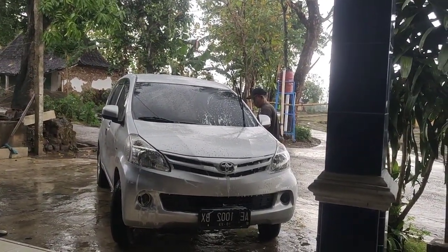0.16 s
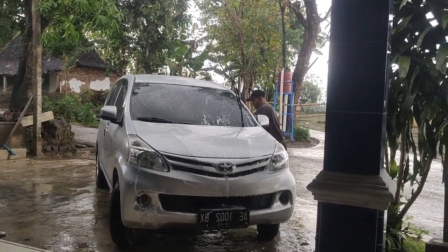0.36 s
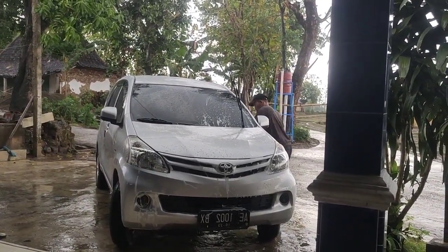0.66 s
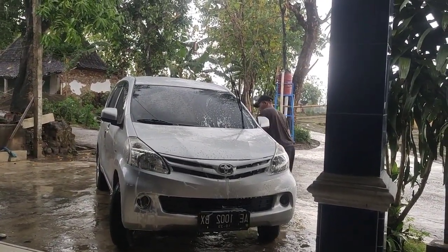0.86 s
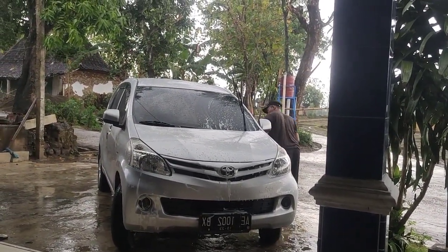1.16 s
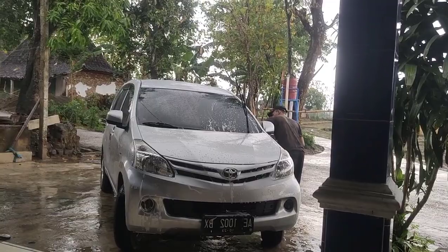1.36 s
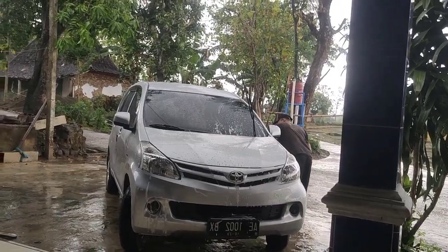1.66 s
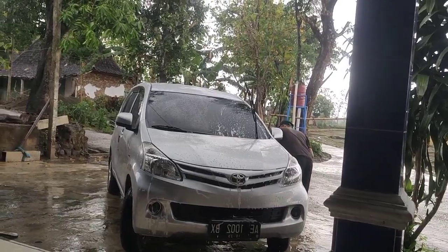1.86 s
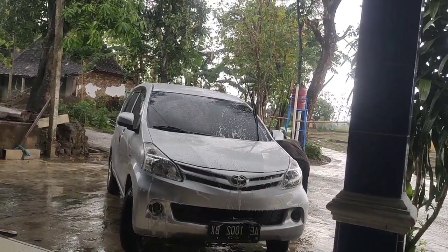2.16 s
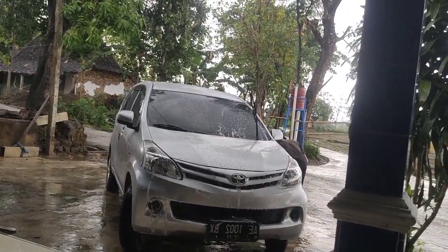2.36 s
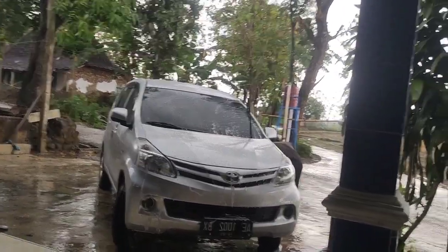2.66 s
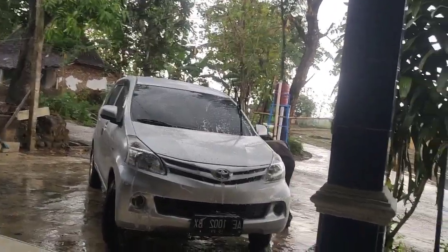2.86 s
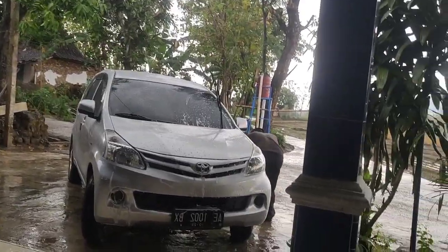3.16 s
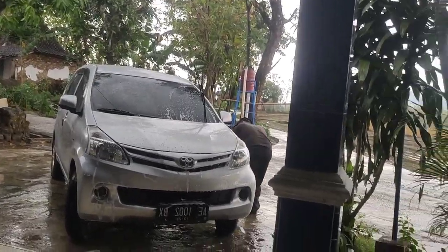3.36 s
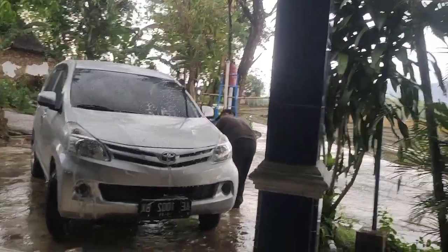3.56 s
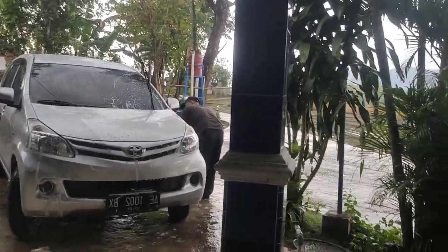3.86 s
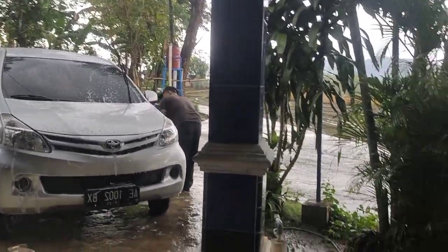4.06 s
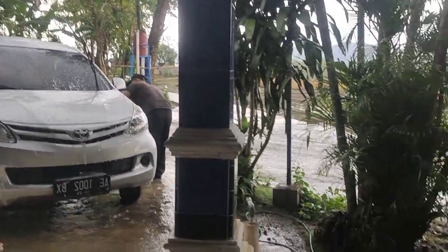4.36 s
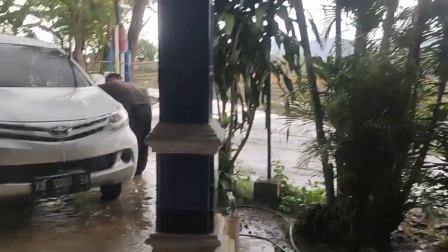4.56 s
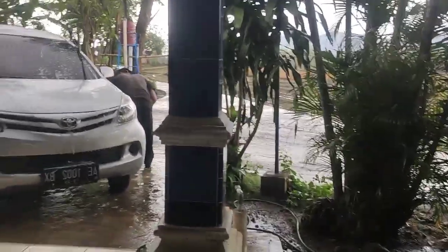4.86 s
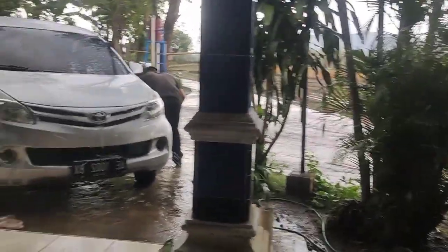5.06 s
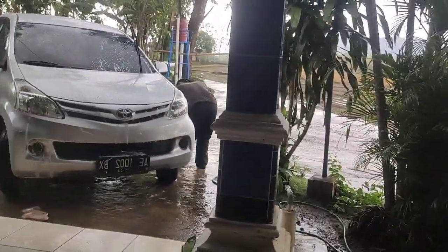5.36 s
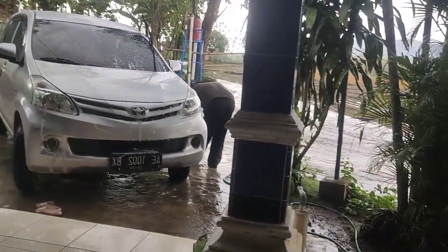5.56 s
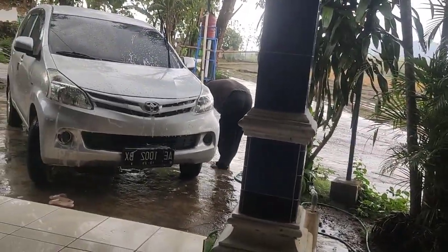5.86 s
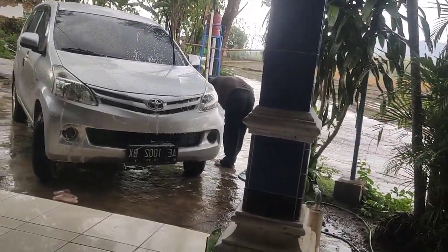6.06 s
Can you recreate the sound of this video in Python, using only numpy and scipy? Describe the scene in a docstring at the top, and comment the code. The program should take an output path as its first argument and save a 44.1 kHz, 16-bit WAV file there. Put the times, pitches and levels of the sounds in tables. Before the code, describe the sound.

Light rain hisses steadily around a porch, with a few sharp drips and tiny splashes close by at the start. Hens suddenly break into loud, hoarse squawks, overlapped by clear cries and two wails. The raspy hen carries on alone in shorter, evenly spaced calls, ends with one longer squawk, and the flock settles into soft clucks. A thin chick whistle peeps to the right.

```python
"""Chickens in a wet yard

Chickens cackle over a steady hiss of water, heard from a porch: pulsed, turbulent squawks of a hoarse hen,
clear harmonic cries of others over her, then soft clucks shaped by a beak resonance. A chick whistles to the
right. Noise bursts make drops and splashes on the paving; shaped noise makes the hiss and a breeze."""
import sys
import numpy as np
from scipy import signal
from scipy.fft import rfft, irfft, next_fast_len
from scipy.io import wavfile
from scipy.ndimage import uniform_filter1d, minimum_filter1d

SR = 44100
rng = np.random.default_rng(int(sys.argv[2]) if len(sys.argv) > 2 else 0)


def generate_wav(signal):
    """Clip the signal to [-1, 1] and save it as 16-bit WAV at the path in sys.argv[1]."""
    frames = np.transpose(np.atleast_2d(signal))
    scaled = np.clip(frames, -1, 1) * 32767
    pcm = np.round(scaled).astype(np.int16)
    wavfile.write(sys.argv[1], SR, pcm)


N = 274302  # length in samples
EDGE_HZ = 11650  # cutoff of the final low-pass; overtones of the clear voices stop below it


def gain_of(db):
    """Level law: decibels to amplitude."""
    return 10 ** (np.asarray(db) / 20)


def evened(x):
    """Equal power: scales to rms 1."""
    return x / np.sqrt(np.mean(x ** 2) + 1e-20)


def read(points, hz):
    """Interpolation on a log-frequency axis, with the end values held beyond the table."""
    f, value = np.transpose(points)
    return np.interp(np.log(hz + 1), np.log(f + 1), value)


def add(mix, s, sound):
    """Superposition: mixes a sound in at time s in seconds."""
    part = mix[max(round(s * SR), 0):][:len(sound)]
    part += sound[:len(part)]


def laid_out(source, table):
    """Superposition of one source's events: the first column is the start, the rest go to the source."""
    track = np.zeros(N)
    for s, *row in table:
        add(track, s, source(*row))
    return track


def filtered(x, gain):
    """Linear filtering: multiplies the spectrum by a gain that is a function of frequency."""
    size = next_fast_len(x.shape[-1] + 2048)
    spectrum = rfft(x, size) * gain(np.fft.rfftfreq(size, 1 / SR))
    return irfft(spectrum, size)[..., :x.shape[-1]]


def waver(size, hz):
    """Random modulation: low-passed noise of rms 1, up to about hz changes a second."""
    return evened(filtered(rng.standard_normal(size), lambda f: 1 / (1 + (f / hz) ** 4)))


def fade(size, edge_s):
    """Tapered window: a soft start and end."""
    return signal.windows.tukey(size, min(2 * edge_s * SR / size, 1))


def envelope(t, attack_s, release_s):
    """Amplitude envelope: smooth attack, hold, straight release."""
    attack = np.sin(np.pi / 2 * np.minimum(t / attack_s, 1)) ** 2
    return attack * np.minimum((t[-1] - t) / release_s, 1)


def diffuse(pair):
    """Diffuse field: left-right coherence varies with frequency, high near 400 Hz and low in the treble."""
    # Each row: frequency in Hz, coherence of left and right from 0 to 1.
    coherence = [(30, .1), (85, 0.51), (140, 0.856), (400, 0.943), (800, 0.152), (1400, 0), (3000, 0.112),
                 (11000, 0)]
    mid = filtered(pair[0], lambda f: np.sqrt((1 + np.clip(read(coherence, f), -1, 1)) / 2))
    side = filtered(pair[1], lambda f: np.sqrt((1 - np.clip(read(coherence, f), -1, 1)) / 2))
    return np.array([mid + side, mid - side])


def water_hiss(level_db=-47.5, drops_per_s=700, patter=0.443, spread_db=3, flicker_db=1):
    """Many random impacts sum to noise: a wash of far drops, a patter of nearer ones, a flickering treble."""
    # Spectrum of the hiss. Each row: frequency in Hz, relative density in dB per Hz.
    spectrum = [(18, -60.5), (30, -30.5), (48, -21.5), (184, 0), (343, -2.5), (418, 2), (671, 1.5),
                (1310, -8), (2000, -5.5), (3460, -8.5), (4670, -17.5), (7670, -7), (8690, -11.5),
                (9840, -30.5), (11400, -23.5), (14800, -68), (22000, -120)]
    # Slow course of the treble. Each row: time in seconds, treble gain in dB.
    treble_course = [(0, 7), (.45, 8), (1.5, 12), (3.7, 7.5), (4.4, 6.5), (5.1, 4), (6.2, 4)]
    sizes = gain_of(spread_db * np.minimum(rng.exponential(1, (2, N)), 4)) * rng.choice([-1, 1], (2, N))
    near = evened(sizes * (rng.random((2, N)) < drops_per_s / SR))
    wash = diffuse(rng.standard_normal((2, N)) + patter * near)
    wash = evened(filtered(wash, lambda f: gain_of(read(spectrum, f))))
    low = filtered(wash, lambda f: 1 / (1 + (f / 1400) ** 2))
    treble_db = np.interp(np.arange(N) / SR, *np.transpose(treble_course)) + flicker_db * waver(N, 42)
    low_swell_db = 1.5 * waver(N, 9.6)
    return gain_of(level_db) * (low * gain_of(low_swell_db) + (wash - low) * gain_of(treble_db))


def breeze(db=-66, centre_hz=95):
    """Turbulent pressure: narrow low noise, slowly wavering, as air lightly buffets the left microphone."""
    rumble = filtered(rng.standard_normal(N), lambda f: 1 / (1 + ((f - centre_hz) / 35) ** 2))
    return np.outer([1, 0], gain_of(db + 2 * waver(N, 2.3)) * evened(rumble))


def drop(peak_db, spray_s, tick_s=0.00034):
    """Impact noise: a sharp tick on wet paving and a brief spray, two exponential decays."""
    t = np.arange(SR // 16) / SR
    tick = rng.standard_normal(len(t)) * (np.exp(-t / tick_s) + np.exp(-t / spray_s))
    colour = [(600, -47), (2800, -13), (8000, 14.5), (10500, -9.5)]  # Hz, dB
    tick = filtered(tick, lambda f: gain_of(read(colour, f)))
    return gain_of(peak_db) * tick / abs(tick).max()


def splash(db, rise_s, grain_db=3):
    """Scattered water as grainy noise: a soft swell of fine spray on the paving."""
    t = np.arange(SR // 4) / SR
    spray = rng.standard_normal(len(t)) * gain_of(grain_db * waver(len(t), 400))
    colour = [(900, -34), (2900, 8.0), (5200, -5.5), (7700, 1.5), (10500, -13.5)]  # Hz, dB
    spray = evened(filtered(spray, lambda f: gain_of(read(colour, f))))
    return gain_of(db) * spray * t / rise_s * np.exp(1 - t / rise_s)


def paving():
    """Independent impacts: single drops and splashes near by."""
    # Near drops. Each row: start in seconds, peak in dB, decay of the spray in seconds.
    near_drops = [(0.0487, -26, 0.00253), (0.1363, -21.5, 0.003), (0.446, -34.5, 0.0065),
                  (0.696, -30.5, 0.0082), (1.896, -25, 0.0098), (2.588, -31.5, 0.00576),
                  (2.88, -34, 0.0062), (3.6374, -37.5, 0.0085), (4.7736, -35, 0.0108),
                  (6.1027, -35.5, 0.0096)]
    # Soft splashes. Each row: start in seconds, level in dB, rise in seconds.
    soft_splashes = [(0.06, -35.5, 0.00504), (0.144, -39.5, 0.0097), (0.305, -41.5, 0.0116)]
    return laid_out(drop, near_drops) + laid_out(splash, soft_splashes)


def cycles(hz, jitter, jitter_hz):
    """Phase is the integral of frequency: cycle count of a membrane whose pitch trembles."""
    return np.cumsum(hz * (1 + jitter * waver(len(hz), jitter_hz))) / SR


def peep(db, top_hz, length, fall=0.27, swell_db=7, quaver=0.0702):
    """Pure tone: a thin whistle that holds its top note, then drops, louder and quavering."""
    u = np.linspace(0, 1, int(length * SR))
    hz = top_hz * (1 - fall * np.minimum(abs(u - .25) / .66, 1) ** 3.6)
    whistle = np.sin(2 * np.pi * cycles(hz, .005 + quaver * u ** 4, 350))
    whistle *= gain_of(swell_db * u ** 3) * envelope(u * length, attack_s=0.0506, release_s=0.00084)
    return gain_of(db) * evened(whistle)


def chick_peeps():
    """Repeated pure tones of the chick, at a common trim of -5 dB."""
    # Each row: start in seconds, level in dB before the trim, top pitch in Hz, length in seconds.
    peeps = [(0.147, -48.5, 4375, 0.148), (0.538, -48, 4410, 0.185), (4.26, -46.5, 4449, 0.1496),
             (4.832, -48, 4303, 0.1716), (5.17, -45, 4477, 0.15), (5.763, -47, 4450, 0.147)]
    return gain_of(-5.0) * laid_out(peep, peeps)


def puffs(turns):
    """Modulated turbulence: noise let through once a cycle."""
    return evened((0.087 + np.exp(-(turns % 1) / 0.69)) * rng.standard_normal(len(turns)))


def gesture(length, start_hz, crest_hz, end_hz, crest, bend, droop):
    """Pitch follows one push of air to a crest and back; early: climb still to go, late: sag so far, 0-1."""
    t = np.arange(0, length, 1 / SR)
    crest_s = length * np.clip(crest, .05, .95)
    early = np.cos(np.pi / 2 * np.minimum(t / crest_s, 1) ** bend) ** 2
    late = (np.maximum(t - crest_s, 0) / (length - crest_s)) ** droop
    hz = crest_hz + (start_hz - crest_hz) * early + (end_hz - crest_hz) * late
    return t, hz, early, late


def roughness(t, core, onset, ending, settle_s, break_s):
    """Unstable oscillation: the syrinx catches roughly, settles, and breaks up as the air runs out."""
    rough = core + onset * np.exp(-t / settle_s) + ending * np.exp((t - t[-1]) / break_s)
    return np.clip(rough, .02, .9)


def partials(turns, orders, flicker_db, smear):
    """Harmonic series, one a row, each swelling on its own; uneven timing blurs the high ones."""
    turns = turns + smear * waver(len(turns), 300)
    rows = []
    for k in orders:
        tone = np.cos(2 * np.pi * (k * turns + rng.random()))
        rows.append(tone * gain_of(flicker_db * waver(len(turns), 45)))
    return np.array(rows)


def rattle(rough, rate_hz, depth):
    """Amplitude modulation: an uneven beat of the syrinx sets side tones beside each partial."""
    beat = np.cos(2 * np.pi * cycles(np.full(len(rough), rate_hz), .25, 50))
    swing = np.minimum(depth * rough, 1)
    return (1 + swing * beat) / np.sqrt(1 + swing ** 2 / 2)


def clear_voice(hz, tone_db, overtone_db, rough, shrill_db, jitter=0.05096):
    """Source and filter, open beak: strong fundamental, breathy overtones that swell at throat resonances."""
    # Throat of the clear voices. Each row: frequency in Hz, gain in dB.
    throat = [(300, -19), (650, 19), (1120, 1.5), (1400, 14.5), (1720, 18), (2060, -4.5), (2280, -19),
              (2750, -11.5), (3900, -68), (4450, -19.5), (5200, -19.5), (6400, -20.5), (7300, -13.5),
              (9600, -41)]
    size, turns = len(hz), cycles(hz, jitter * rough, 113.8)
    k = np.arange(2, 17)[:, None]
    weight = gain_of(read(throat, k * hz)) * (k * hz < EDGE_HZ)
    upper = (weight * partials(turns, k[:, 0], flicker_db=2, smear=.002 + .03 * rough)).sum(0)
    doubling = 1 + np.minimum(3 * rough, 1) * np.cos(np.pi * turns)  # strain doubles the period
    upper = evened(upper / np.linalg.norm(weight, axis=0) * doubling)
    air = evened(filtered(puffs(turns), lambda f: gain_of(read(throat, f))))
    hiss = filtered(air, lambda f: 1 - 1 / (1 + (f / 4000) ** 8))
    upper = np.sqrt(1 - rough ** 2) * upper + .45 * rough * air + 2.8 * np.minimum(rough, .35) * hiss
    upper = filtered(upper, lambda f: gain_of(read([(3000, 0.008), (4800, shrill_db)], f)))
    voice = gain_of(tone_db) * np.sqrt(2) * np.cos(2 * np.pi * turns) + gain_of(overtone_db) * upper
    voice *= rattle(rough, rate_hz=85., depth=1.3) * gain_of(3 * rough * waver(size, 80))
    return voice * envelope(np.arange(size) / SR, attack_s=0.03186, release_s=0.01445)


def cry(length, tone_db, overtone_db, start_hz, crest_hz, end_hz, crest, core, shrill_db):
    """Pitch and level rise with effort: a short arched cry, rough at both ends."""
    t, hz, early, late = gesture(length, start_hz, crest_hz, end_hz, crest, bend=0.7, droop=1.494)
    rough = roughness(t, core, onset=.35, ending=.45, settle_s=.022, break_s=.018)
    tone_course_db = tone_db - 8 * early - 8 * late
    return clear_voice(hz, tone_course_db, overtone_db - 6 * early ** 2, rough, shrill_db)


def squawk(length, body_db, rasp_db, start_hz, crest_hz, end_hz, crest, core, chest_db, bend, slip,
           uneven=0.903, flutter_db=3, hiss=0.26, jitter=0.03, drop_share=.6,
           collapse=0.10495, collapse_s=0.02457):
    """Source and filter, strained syrinx: uneven trembling pulses and turbulence through the throat."""
    # Throat of the hoarse hen. Each row: frequency in Hz, gain in dB.
    throat = [(190, -26), (275, -9), (380, -13.5), (540, -10.5), (780, -5.5), (950, -2.5), (1130, 0),
              (1350, 0.5), (1650, -5), (1900, -10), (2200, 1), (2700, 1.5), (3150, -4), (3700, -11),
              (4400, -15), (5200, -17.5), (6200, -15.5), (7600, -4), (9600, -34)]
    t, hz, early, late = gesture(length, start_hz, crest_hz, end_hz, crest, bend=bend, droop=1.4)
    # the pitch slips down early, then holds, and collapses as the air runs out
    early_slip = np.sin(np.pi / 2 * np.minimum(late / drop_share, 1)) ** 2
    hz = hz + slip * (end_hz - crest_hz) * (early_slip - late)
    hz = hz * (1 - collapse * np.exp((t - t[-1]) / collapse_s))
    # both bands swell to the crest and sag; the rasp follows her effort more than the body does
    body_course_db = body_db - 3 * early - 4 * late
    rasp_course_db = rasp_db - 3.5 * early - 9 * late
    rough = roughness(t, core, onset=0.12, ending=0.6, settle_s=0.02, break_s=0.03)
    size = len(t)
    wobble = .01 * waver(size, 35)
    turns = cycles(hz * (1 + wobble), 0.00639 + jitter * rough, 137.4)
    pulses = evened(partials(turns, np.arange(1, 21), flicker_db=3, smear=.003).sum(0))
    # alternately strong and weak pulses
    pulses *= 1 + uneven * rough * (1 + waver(size, 21)) * np.cos(np.pi * turns)
    high_air = filtered(puffs(turns), lambda f: 1 - 1 / (1 + (f / 4800) ** 4))
    air = 0.5 * rough * puffs(turns) + hiss * high_air
    drive = ((1 - rough) * evened(pulses) + air) * rattle(rough, rate_hz=115., depth=1.6)
    voice = filtered(drive, lambda f: gain_of(read(throat, f) + chest_db / (1 + (f / 700) ** 8)))
    low = filtered(voice, lambda f: 1 / (1 + (f / 1900) ** 12))
    voice = gain_of(body_course_db - 1.0) * evened(low) + gain_of(rasp_course_db) * evened(voice - low)
    flutter = gain_of(flutter_db * np.sqrt(rough) * waver(size, 120))
    return voice * flutter * envelope(t, attack_s=0.0164, release_s=0.009)


def hoarse_hen():
    """A run of strained pulse trains: the squawks of one hen."""
    # Each row: start in seconds, length in seconds, body setting in dB (1 dB is then taken off), rasp above
    # about 1.9 kHz in dB, start, crest and end pitch in Hz, place of the crest 0-1, core roughness 0-1,
    # chest tone in dB, lateness of the climb (1 = even), early slip of the pitch 0-1.
    squawks = [ (0.484, 0.2, -27, -47.5, 510.3, 581.6, 570, 0.55, 0.12, 7.5, 0.74, 0.1),
               (0.889, 0.274, -24, -45, 527, 536.4, 545.7, 0.2, 0.09, -14, 1.18, 0.04),
               (1.044, 0.5913, -24, -30.5, 468, 584.7, 536.8, 0.76, 0.23, -4.5, 0.9, 0.04),
               (1.663, 0.1332, -23.5, -32, 594.7, 604.2, 533, 0.17, 0.35, -2.5, 1.52, 0.79),
               (1.872, 0.1053, -23.5, -32, 567.2, 563, 501.6, 0.29, 0.08, -4, 1.5, 0.79),
               (2.069, 0.1305, -25, -31.5, 546.4, 551, 518.2, 0.29, 0.09, -2, 1.47, 0.33),
               (2.321, 0.2028, -24.5, -32.5, 531.9, 560.1, 475.3, 0.27, 0.23, -2, 1.318, 0.97),
               (2.618, 0.2, -25, -32.5, 536.9, 555.2, 472.7, 0.27, 0.2, -5, 1.197, 0.95),
               (2.998, 0.2644, -25.5, -31.5, 510.9, 540.3, 494.2, 0.43, 0.15, -3, 1.3, 0),
               (3.376, 0.1996, -26.5, -31.5, 551.6, 548.5, 473, 0.27, 0.23, 4, 0.98, 0.97),
               (3.792, 0.385, -25.5, -32.5, 473.7, 555, 490, 0.6, 0.14, -1.5, 1.7, 0)]
    return laid_out(squawk, squawks)


def wail(curve, shrill_db):
    """Continuous frequency glide: a drawn-out cry on one unbroken curve."""
    s, *columns = np.transpose(curve)
    t = np.arange(s[0], s[-1], 1 / SR)
    hz, tone_db, overtone_db, rough = (np.interp(t, s, column) for column in columns)
    return s[0], clear_voice(hz, tone_db, overtone_db, np.clip(rough, 0, .9), shrill_db)


def clear_flock():
    """Superposed harmonic voices of the other birds: short cries and two wails."""
    # Short cries. Each row: start in seconds, length in seconds, fundamental in dB, overtones in dB, start,
    # crest and end pitch in Hz, place of the crest 0-1, core roughness 0-1, treble in dB.
    cries = [ (0.47, 0.2, -25.5, -19.5, 674.1, 706.3, 668.1, 0.32, 0.28, 1.5),
             (0.768, 0.143, -16.5, -13, 730.1, 862.4, 806.9, 0.5, 0.01, 5),
             (0.88, 0.1638, -29.5, -24, 831.7, 804.4, 781.6, 0.01, 0.61, -0.5),
             (1.215, 0.23, -15.5, -12.5, 817.8, 837.8, 802, .42, 0.18, -1),
             (1.956, 0.171, -29.5, -24.5, 713.9, 696.8, 645.9, 0.37, 0.11, 3)]
    # Wails as curves. Each row: time in seconds, pitch in Hz, fundamental in dB, overtones in dB,
    # roughness 0-1.
    strained_wail = [(1.015, 745, -42.5, -20, 0.48), (1.09, 721.6, -33, -19.5, 0.28),
                     (1.15, 707.1, -20.5, -15.5, 0.39), (1.23, 692, -13.5, -29, 0.01),
                     (1.32, 699.5, -26.5, -27.5, 0.29), (1.4, 693, -20, -22.5, .24),
                     (1.47, 689.6, -16, -20, 0.3), (1.54, 693.1, -29, -21, 0.34),
                     (1.61, 664.8, -26, -22.5, 0.12), (1.67, 654.9, -33, -31, 0.36)]
    falling_wail = [(1.78, 536.8, -27.5, -21.5, .08), (1.86, 579.6, -18, -23.5, 0.0099),
                    (1.945, 577.7, -22, -19, 0.0103), (2.0, 595.8, -32.5, -43, 0.026),
                    (2.07, 606.8, -33, -37, 0.034), (2.12, 600.1, -19, -29, 0.0081),
                    (2.195, 579.6, -19, -20.5, 0.009), (2.24, 544.7, -31.5, -25.5, 0.0075),
                    (2.33, 528, -30.5, -26, 0.0091), (2.43, 508.7, -37.5, -34.5, 0.0167),
                    (2.52, 485, -47, -26, .12)]
    flock = laid_out(cry, cries)
    add(flock, *wail(strained_wail, shrill_db=-2))
    add(flock, *wail(falling_wail, shrill_db=-2))
    return flock


def cluck(db, pitch_hz, beak_hz, length, width_hz=170, chest_db=-19):
    """Resonance of a nearly shut beak: a short low grunt, rising a little in pitch."""
    u = np.linspace(0, 1, int(max(length, .02) * SR))
    turns = cycles(pitch_hz * (1.01 - 0.1025 * np.exp(-u / 0.253)), 0.0235, 81.0)
    harmonics = evened(sum(np.cos(2 * np.pi * k * turns) for k in np.arange(1, 13)))

    def throat(f):
        """Resonance curves: the beak's peak plus a weaker chest peak at 350 Hz."""
        beak = 1 / (1 + abs((f - beak_hz) / width_hz) ** 3)
        return beak + gain_of(chest_db) / (1 + ((f - 350) / 180) ** 2)

    voice = filtered(harmonics + puffs(turns), throat)
    return gain_of(db) * evened(voice * fade(len(u), 0.0175) * np.exp(-.8 * u))


def murmur_of_clucks():
    """Superposed short resonant grunts: the soft clucks of the flock."""
    # Each row: start in seconds, level in dB, pitch in Hz, beak resonance in Hz, length in seconds.
    clucks = [(3.676, -41.5, 271.3, 600, 0.0544), (3.691, -34.5, 297.7, 834, 0.0506),
              (4.191, -40, 274.1, 640, 0.064), (4.41, -38, 259.3, 736, 0.0675),
              (4.551, -39.5, 251.4, 713, 0.0698), (4.713, -44, 239.1, 612, 0.0363),
              (4.894, -45, 205.2, 610, 0.0536), (5.158, -49, 223.6, 491, 0.111),
              (5.223, -43, 281.2, 784, 0.0745), (5.324, -47.5, 268.2, 726, 0.0726),
              (5.434, -42, 258.4, 710, 0.071), (5.556, -42.5, 258.7, 750, 0.056),
              (5.572, -44.5, 214, 245, 0.024), (5.685, -43, 231.6, 632, 0.0748),
              (5.968, -47, 261.5, 690, 0.0623), (6.016, -50, 248.3, 250, 0.0342),
              (6.115, -48.5, 244.1, 674, 0.0425)]
    return laid_out(cluck, clucks)


def porch(x, trim_db=-1.5):
    """Narrow resonances near the microphone: a partial swells as it glides through one."""
    # Each row: frequency in Hz, width in Hz, boost in dB.
    modes = [(953.6, 18.2, 9), (1039, 14.3, 8)]

    def response(f):
        """Sum of resonators: each mode adds its peak to the direct path."""
        return 1 + sum((gain_of(db) - 1) / (1 + 2j * (f - hz) / width) for hz, width, db in modes)

    return gain_of(trim_db) * filtered(x, response)


def yard(x, wet_db, lead_ms, shade):
    """Arrival-time and level differences place a source; walls and paving add a short diffuse tail."""
    # Reverberation. Each row: frequency in Hz, time to decay by 60 dB in seconds.
    decay_times = [(200, 0.46), (700, 0.4706), (2000, 0.319), (8000, 0.2)]
    # Level difference, scaled by shade. Each row: frequency in Hz, left minus right in dB.
    left_minus_right = [(100, 8.5), (600, -2.5), (1100, 0.5), (1700, -1), (2700, -15.5), (4200, -13),
                        (6500, -4.5), (11000, -4.5)]
    size = SR // 2
    taps = rng.choice([-1., 1.], (2, size)) * (rng.random((2, size)) < 3000 / SR)
    taps = taps * (np.arange(size) > .004 * SR)
    hz, t, z = signal.stft(diffuse(taps), SR, nperseg=256)
    decay = gain_of(-60 * t / read(decay_times, hz)[:, None])
    tail = signal.istft(z * decay, SR, nperseg=256)[1]
    echo = signal.fftconvolve(x[None], tail / np.linalg.norm(tail[0]), axes=1)[:, :N]
    # leaves and walls scatter treble most
    echo = filtered(echo, lambda f: gain_of(read([(1500, 3.98), (5000, 10.89)], f)))
    # direct sound reaches the left microphone first
    later = filtered(x, lambda f: np.exp(-2j * np.pi * f * lead_ms * 1e-3))
    both = (np.array([x, later]) + gain_of(wet_db) * echo) / np.hypot(1, gain_of(wet_db))
    return filtered(both, lambda f: gain_of(np.outer([.5, -.5], shade * read(left_minus_right, f))))


def scene():
    """Superposition in the yard: each group of birds in its own place, over the hiss of water."""
    mix = water_hiss() + breeze()
    mix += yard(paving(), wet_db=-6, lead_ms=.02, shade=.3)
    mix += yard(chick_peeps(), wet_db=-5, lead_ms=.24, shade=1.1)
    mix += yard(clear_flock(), wet_db=-10, lead_ms=.22, shade=.8)
    mix += yard(porch(hoarse_hen()), wet_db=-6, lead_ms=0.19, shade=0.69)
    mix += yard(murmur_of_clucks(), wet_db=-9, lead_ms=0.207, shade=0.93)
    return mix


def record(dry):
    """Peak limiting, with one gain for both channels over 10 ms windows; then a low-pass band limit."""
    room = np.minimum(.86 / (abs(dry).max(0) + 1e-9), 1)
    held = dry * uniform_filter1d(minimum_filter1d(room, size=441), size=441)
    low_pass = signal.firwin(511, EDGE_HZ, window=("kaiser", 9), fs=SR)
    return signal.oaconvolve(held, low_pass[None], "same")


dry = scene()
out = record(dry)
generate_wav(out)
```